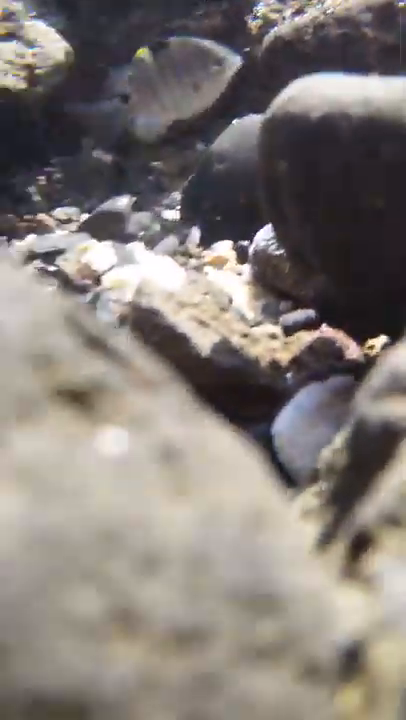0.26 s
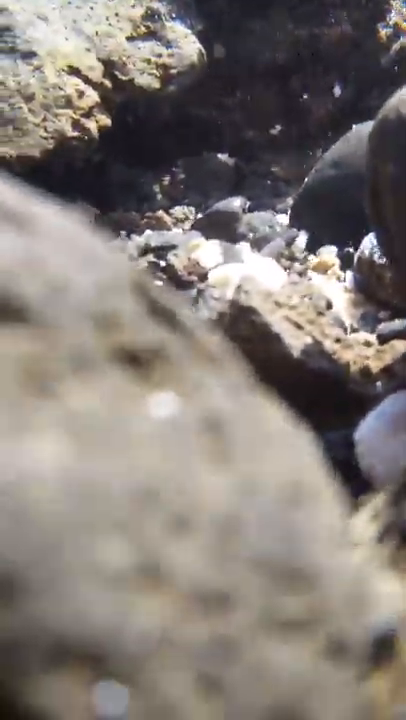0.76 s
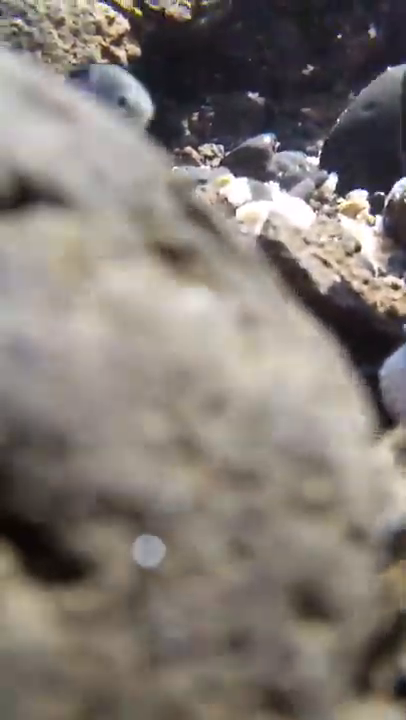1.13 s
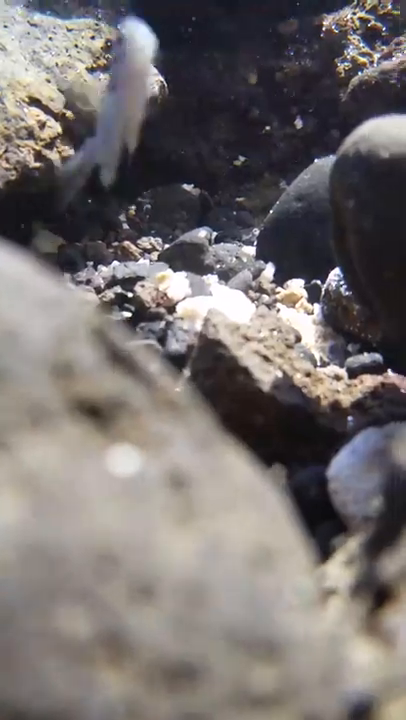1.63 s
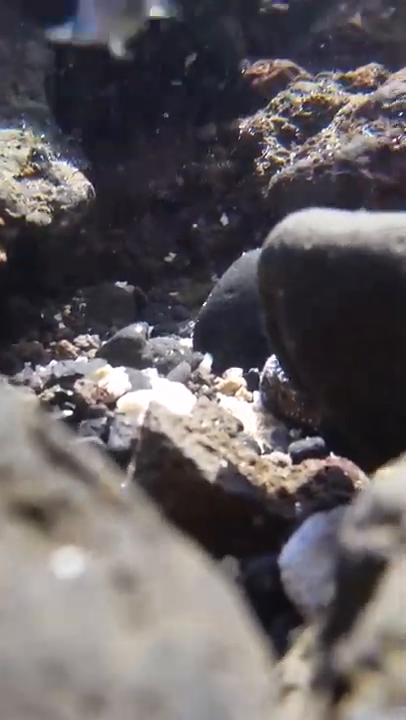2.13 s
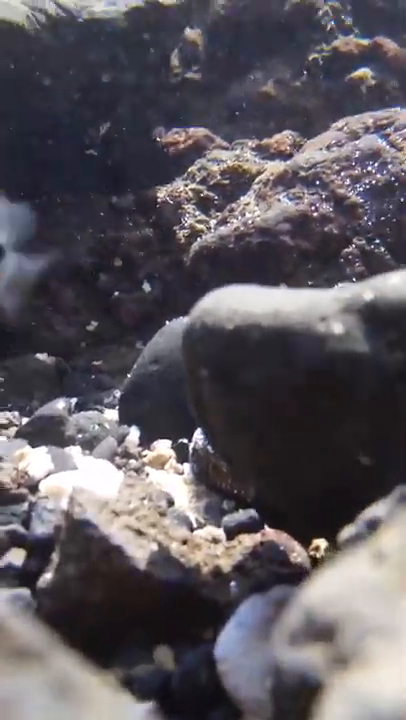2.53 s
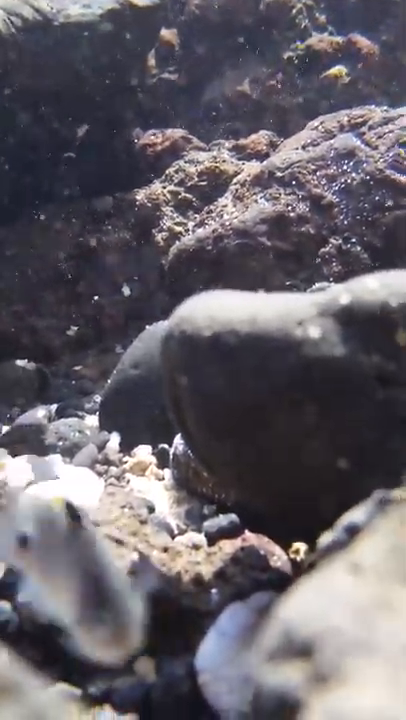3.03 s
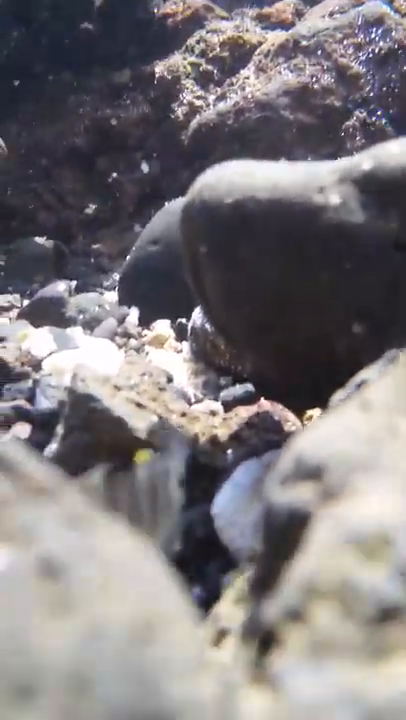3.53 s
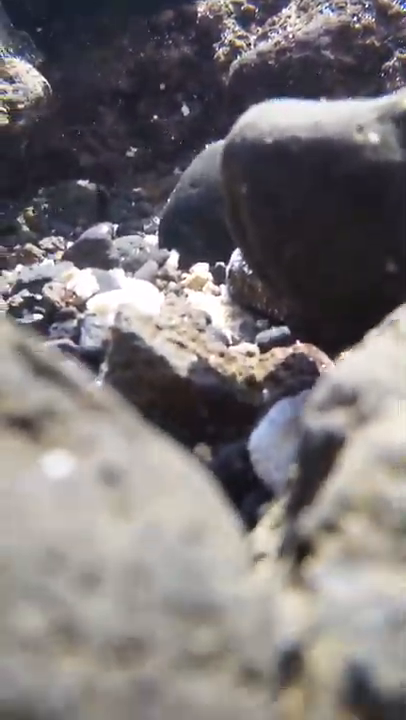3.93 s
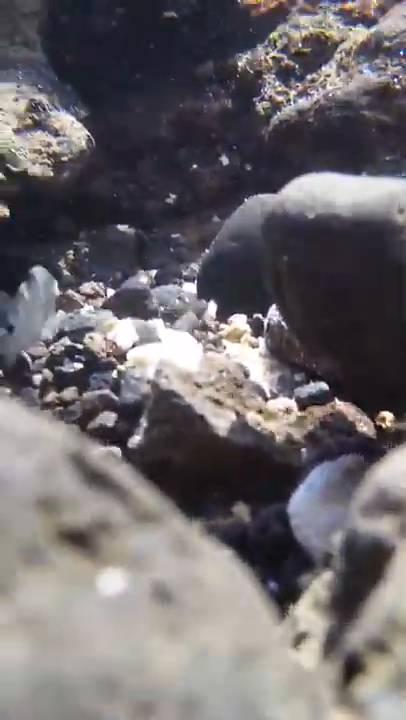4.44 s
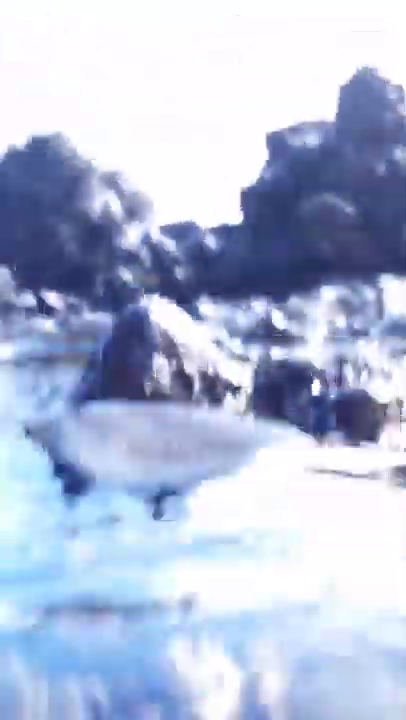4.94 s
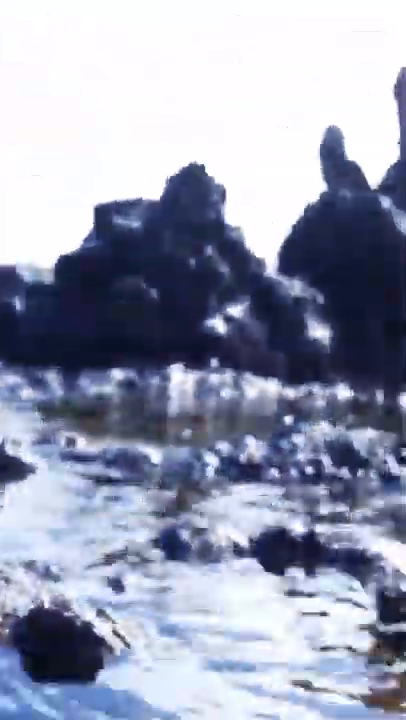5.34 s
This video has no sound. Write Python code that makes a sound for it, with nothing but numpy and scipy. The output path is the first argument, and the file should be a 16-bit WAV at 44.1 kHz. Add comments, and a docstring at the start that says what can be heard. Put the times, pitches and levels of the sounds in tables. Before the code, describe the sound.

A dull, low wash of surf heard under water runs throughout, mainly on the left, with faint bubble fizz and sand hiss. Much louder and very close on the right, stones hit the microphone's housing with short, hollow thumps. A brief scrape and a knock open the sound. Sharp knocks with a click come at 0.8 seconds, a rattle from 1.0 to 1.2, and another hard knock at 1.6. Grit then scrapes and ticks among lighter bumps, building to a dense, crunchy rattle from 2.6 to 2.9 as the wash swells slightly. Hard knocks land at 3.0, followed by ringing knocks and a scrape around 3.3. Separate knocks fall at 3.6 and between 4.1 and 4.3. At about 4.75 a loud, tight clatter and scrape come with a faint swish as the microphone surfaces. Two softer bumps follow just after 5 seconds, and the wash continues to about 5.6.

```python
"""A short scrape and a knock sound on the right, over the dull wash of surf heard under water.
A camera sits in a rocky tide pool. Stones knock on its housing in short rattles and make it ring,
and grit scrapes and ticks along it, all close to the right microphone port (its sound opening).
The left port hears mostly the surf, with a faint fizz of bubbles and a hiss of moving sand,
and near the end a swish as the camera surfaces."""
import sys
import numpy as np
from scipy import signal
from scipy.fft import rfft, irfft
from scipy.io import wavfile

SR = 44100
rng = np.random.default_rng(int(sys.argv[2]) if len(sys.argv) > 2 else 0)


def file_out(sig):
    """Save sig as 16-bit WAV at sys.argv[1]."""
    # one column per channel
    cols = np.atleast_2d(sig).T
    # limit, then scale
    lim = np.clip(cols, -1, 1)
    pcm = np.round(lim * 32767).astype(np.int16)
    wavfile.write(sys.argv[1], SR, pcm)


N = 246519
TIME = np.arange(N) / SR

# how the water surges: (time [s], left wash [dB], fizz [dB], left sand hiss [dB])
SURGE = [(0.0, -41.0, -76, -60), (0.2, -41, -89, -67.5), (0.5, -42, -86.5, -73.5),
         (0.76, -35.5, -79.5, -67), (0.95, -42.5, -85, -77.5), (1.3, -43.5, -91, -76), (1.9, -43, -91, -66),
         (2.35, -45, -89, -68.5), (2.65, -36, -81.0, -61), (2.9, -34.5, -75.0, -55.5),
         (3.03, -40, -84, -70.5), (3.3, -39.5, -103.5, -65.5), (3.6, -41.0, -94, -65.5),
         (4.05, -38.0, -89.5, -86), (4.35, -36.5, -81, -65), (4.65, -37, -73.5, -67.5),
         (5.0, -38.5, -83.5, -72.5), (5.58, -39, -83, -83)]
# tone of the wash at each port, of bubbles and of sand: (frequency [Hz], relative level [dB])
LEFT_WASH_TONE = [(25, -15.5), (60, -4), (100, 1), (150, 2), (250, -6), (400, -9.5), (600, -18.5),
                  (850, -23), (1200, -44), (1700, -53), (3000, -66), (5000, -70)]
RIGHT_WASH_TONE = [(25, -14), (60, -18), (140, 6.5), (250, -0.5), (400, -4.5), (600, -7), (850, -4),
                   (1200, -31), (1700, -47), (2300, -45), (3000, -31), (5000, -52)]
FIZZ_TONE = [(5000, -26), (9000, -22), (11000, -1.5), (12500, 7.5), (14000, -8.5), (16000, -23)]
SAND_TONE = [(600, 11), (1200, 10), (1700, 0), (2300, -6), (3200, -5.5), (4200, -16), (5500, -30),
             (9000, -33)]
# strokes of grit dragged over the housing: (start [s], swell [s], fade [s], peak force [dB])
STROKES = [(0.0, .004, .025, -51.5), (1.184, .008, 0.029, -65), (1.312, .028, 0.054, -55),
           (1.612, .032, .035, -43.5), (1.65, .02, 0.068, -54.5), (1.795, .08, 0.073, -43.5),
           (1.93, .075, 0.075, -51), (2.15, .03, 0.11, -59.5), (2.24, .125, 0.23, -54.5),
           (2.45, .125, 0.091, -46), (2.64, .04, .06, -57), (2.745, .023, .014, -32.5),
           (2.785, .008, 0.12, -45.5), (2.86, .035, 0.11, -68), (3.038, .038, 0.036, -57),
           (3.08, .11, 0.15, -66.5), (3.245, .048, .11, -45), (3.37, .022, .031, -40.5),
           (4.165, .075, .03, -57.5), (4.753, .012, .06, -38), (4.788, .018, .022, -33.5)]
# tone of grit sliding and of grit being crushed: (frequency [Hz], relative level [dB])
GRIT_TONE = [(250, 7.5), (500, 7.5), (800, 8.5), (1200, -4.5), (1900, -4.5), (2400, 1), (3000, 5),
             (3850, -3), (4300, -46), (5700, -35), (7500, -60.5), (15000, -56.5)]
CRUSH_TONE = [(1500, -21), (2800, -6.5), (3900, 6.5), (5000, -5), (6500, -13), (8500, -36), (13000, -32.5),
              (16000, -39.5)]
# low rings that scraping stirs: (frequency [Hz], relative level [dB], time to fade by 60 dB [s])
HOUSING_RINGS = [(176.6, -7.5, 0.055), (233, -9.5, 0.082), (310, -10, 0.043)]
# the loudest single grains catching: (time [s], level [dB])
TICKS = [(0.0754, -10.5), (0.8131, -7), (1.0485, -26), (1.1915, -28), (1.5891, -3), (1.61, -19.5),
         (1.8782, -14.5), (2.224, -15), (2.4935, -17), (2.5716, -8.5), (2.6531, -14), (2.671, -18),
         (2.6802, -12), (2.7324, -14), (2.7683, -14), (2.7896, 3), (2.795, -9.5), (2.8042, -11),
         (2.812, -10.5), (2.8254, -14.5), (2.8344, -15), (2.855, -15), (2.9904, -8.5), (3.3638, -12.5),
         (3.3916, -4), (3.413, -14), (4.2536, -18), (4.3345, -28.5), (4.7331, -7.5), (4.7653, -7),
         (4.8062, -9), (4.8162, -12.5)]
# thin, high snaps at a few of the loudest moments: (time [s], level [dB])
SNAPS = [(0.8132, -9), (1.5895, -22.5), (4.7339, -13), (4.753, -28), (4.806, -30), (4.816, -33)]
# tone of one grain's tick and of a snap: (frequency [Hz], relative level [dB])
TICK_TONE = [(300, -16), (700, 4.5), (1300, -3), (1950, -4.5), (2600, 3), (3200, 3), (3900, -6),
             (4700, -18), (6000, -25), (7300, -42.5), (10000, -44.5), (15000, -36.5)]
SNAP_TONE = [(5000, -13), (8500, -10.5), (11000, -4), (13000, 2), (16000, -15.5)]
# stones hitting the housing:
# (time [s], peak [dB], time for the force to rise [ms], ring pitch [Hz], ring relative to push [dB])
KNOCKS = [(0.075, -10, 2.32, 108, -24), (0.8125, 3.5, 1.81, 114, -21.5), (0.815, -10.5, 1.74, 358, -16),
          (0.8331, 2.5, 2.3, 345, -11.5), (0.8508, -3, 2.37, 330, -9), (1.0473, -1, 1.5, 102.4, 5.5),
          (1.0523, -11.5, 1.9, 134.6, -24), (1.09, -12.5, 3.5, 124, -24.5), (1.1102, -24, 3.2, 191, -19),
          (1.1597, -4.5, 2.06, 416, -8.5), (1.1827, -4, 2.02, 401, -3), (1.191, -13, 3.7, 193, 25),
          (1.379, -32, 1.6, 308, -10), (1.5884, 3.5, 2.45, 382, -10), (1.594, -17, 1.4, 395, -5.5),
          (1.6096, -3, 2.96, 323, -19.5), (1.622, -13, 3.6, 170, 15.5), (1.8272, -16.5, 0.97, 255, 5),
          (1.8748, -13, 1.08, 268, -2), (1.8902, -10.5, 1.9, 183, 2.5), (2.0638, -25.5, 4.3, 142, -7.5),
          (2.2247, -16.5, 1.2, 279.4, 3.5), (2.401, -26, 1, 197, 8), (2.516, -18, 5.3, 223, -20),
          (2.572, -17, 2.5, 189, -16), (2.5977, -13, 2.3, 422, -18.5), (2.6014, -6.5, 4.8, 176, -0.5),
          (2.6537, -5.5, 2.65, 400, -13), (2.6686, -6, 2.72, 390, -30), (2.682, -11, 2.03, 110, 9),
          (2.764, -11.5, 0.69, 179, 12), (2.7747, -4, 2.4, 305, -21), (2.789, -1.5, 1.38, 110.2, 0),
          (2.8119, -5, 3.6, 163, 2.5), (2.8375, -12, 2.1, 204, 17), (2.8745, -15.5, 1.97, 366, -19),
          (2.989, 4.5, 1.79, 394, -8.5), (3.0039, 2, 2.42, 380, -8.5), (3.0126, -5.5, 2.35, 381, -9.5),
          (3.2654, -13, 2.1, 197, 2.5), (3.282, -17.5, 1.6, 198, 6), (3.2907, -15, 1.9, 206, 9),
          (3.313, -0.9, 1.59, 216, 7), (3.3629, -3, 2.2, 223, 6), (3.3767, -10.5, 1.7, 172, 8.5),
          (3.3886, -12.5, 0.94, 320, 4.5), (3.6014, -3.5, 1.36, 183.6, -17.5), (3.628, -15, 2.9, 292, -7.5),
          (4.1161, -2, 2.03, 328.5, -7), (4.147, -2.5, 1.62, 357, -3), (4.2535, -9, 1.26, 380, -2),
          (4.3337, -2, 2.38, 332, -14), (4.7321, 4.5, 1.7, 263, -20.5), (4.7339, -3.5, 2.77, 148, -13),
          (4.7526, -2, 0.84, 108, 5.5), (4.7598, 3.5, 1.9, 179, -25.5), (4.765, 0.5, 1.55, 187, -29.5),
          (4.7705, -2.5, 1.52, 179.6, -9), (4.7802, -17, 2.9, 185, -2), (4.7995, -9.5, 1.12, 426, -4),
          (5.0427, -17, 4.9, 110, 2), (5.0669, -8, 2.88, 137, -13.5)]
# how the housing wall passes a knock on to the port: (frequency [Hz], relative level [dB])
WALL_TONE = [(100, 3.5), (480, 4), (780, 5.5), (1300, 4), (1800, -11), (2300, 11), (3000, 16.5), (3800, 15),
             (5500, 5.5)]


def from_db(db):
    """Turn decibels into a number to multiply by."""
    return 10 ** (np.asarray(db) / 20)


def rms_one(x):
    """Scale a sound so its average strength (rms) is 1."""
    return x / np.sqrt(np.mean(x ** 2) + 1e-20)


def peak_one(x):
    """Scale a sound so its peak is 1."""
    return x / (np.abs(x).max() + 1e-20)


def in_time(rows):
    """Join a table's points with straight lines, one curve per column after the time."""
    times, *columns = np.transpose(rows)
    return [np.interp(TIME, times, column) for column in columns]


def keep_side(x, hz, side, order=2):
    """Keep the "low" or "high" side of a frequency."""
    return signal.sosfilt(signal.butter(order, hz, side, fs=SR, output="sos"), x)


def colour(x, tone, size=8192):
    """Give a sound the tone in a table; white noise keeps its overall level."""
    hz, db = np.transpose(tone)
    grid_hz = np.maximum(np.fft.rfftfreq(size, 1 / SR), 1)
    gains = from_db(np.interp(np.log(grid_hz), np.log(hz), db))
    # fold the filter so that nothing sounds before its cause (minimum phase)
    cepstrum = irfft(np.log(gains))
    cepstrum[1:size // 2] *= 2
    cepstrum[size // 2 + 1:] = 0
    response = irfft(np.exp(rfft(cepstrum)))
    return signal.fftconvolve(x, response / np.linalg.norm(response))[:len(x)]


def drift(steps_per_s):
    """A curve that wanders between random values, mostly within -1 to 1."""
    steps = rng.standard_normal(8192)
    return np.interp(TIME * steps_per_s, np.arange(len(steps)), steps)


def ring(push, hz, fade_s):
    """A push starts one note ringing; it falls by 60 dB in fade_s."""
    decay = from_db(-60 / (fade_s * SR))
    angle = 2 * np.pi * hz / SR
    return signal.lfilter([1, -1], [1, -2 * decay * np.cos(angle), decay * decay], push)


def add(track, start_s, sound):
    """Mix a sound into a track at a given time."""
    start = round(start_s * SR)
    track[start:start + len(sound)] += sound[:N - start]


def surf(right_db=-12.0, waver_db=0.8):
    """Churning water, muffled differently at each port, and a fizz of fine bubbles on the left."""
    wash_db, fizz_db, _ = in_time(SURGE)
    noise = rng.standard_normal((3, N))
    swell = from_db(wash_db + waver_db * drift(25))
    left = swell * keep_side(colour(noise[0], LEFT_WASH_TONE), 5500, "low")
    right = from_db(right_db) * swell * colour(noise[1], RIGHT_WASH_TONE)
    fizz = from_db(fizz_db) * colour(noise[2], FIZZ_TONE)
    return np.array([left + fizz, right])


def currents(contacts, rumble_db=-55, slosh_db=-15, settle_s=0.034, graze_db=-9):
    """Sand hisses on the left and grazes the right, where water rumbles, more so after a contact."""
    *_, sand_db = in_time(SURGE)
    noise = rng.standard_normal((3, N))
    sand = from_db(sand_db) * colour(noise[0], SAND_TONE)
    graze = from_db(sand_db + graze_db) * colour(noise[1], GRIT_TONE)
    decay = np.exp(-1 / (settle_s * SR))
    slosh = signal.lfilter([1 - decay], [1, -decay], np.abs(contacts))   # smoothed contact strength
    low_noise = keep_side(noise[2], 90, "low", order=4)
    rumble = rms_one(keep_side(low_noise, 42, "high"))
    rumble *= from_db(rumble_db) + from_db(slosh_db) * slosh
    return np.array([sand, graze + rumble])


def surfacing(start_s=4.73, length_s=0.11, level_db=-54):
    """A brief swish as the camera breaks the surface."""
    swell = np.sin(np.pi * np.clip((TIME - start_s) / length_s, 0, 1))
    return from_db(level_db) * swell * colour(rng.standard_normal(N), SAND_TONE)


def stroke_force(sharpness=1.2):
    """Each stroke of grit presses harder up to a peak, then lets go."""
    power = np.zeros(N)
    for start_s, swell_s, fade_s, peak_db in STROKES:
        ramp = np.interp(TIME - start_s, [0, swell_s, swell_s + fade_s], [0, 1, 0])
        power += (from_db(peak_db) * np.sin(np.pi / 2 * ramp) ** sharpness) ** 2
    return np.sqrt(power + 1e-12)


def scrape(force, slips_per_s=6000, size_db=3.0, judder_db=4.0, rasp_db=4, crush_db=13, hum_db=13):
    """Many tiny slips rasp and set the housing humming; hard pressure crushes grit, which is brighter."""
    sizes = from_db(size_db * np.minimum(rng.exponential(1, N), 5))
    directions = rng.choice([-1, 1], N)
    slipping = rng.random(N) < slips_per_s / SR
    slips = rms_one(sizes * directions * slipping * from_db(judder_db * drift(300)))
    rasp = from_db(rasp_db) * colour(slips * force, GRIT_TONE)
    crushing = slips * rng.standard_normal(N) * force ** 1.687   # grows faster than the force
    crush = from_db(crush_db) * colour(crushing, CRUSH_TONE)
    drag = keep_side(slips, 750, "low") * force ** 0.69   # even a light rub stirs the housing
    hum = sum(from_db(db) * rms_one(ring(drag, hz, fade_s)) for hz, db, fade_s in HOUSING_RINGS)
    return rasp + crush + from_db(hum_db) * np.std(force) * rms_one(hum)


def ticks(force, decay_s=0.00087, chances_per_s=42, above_force_db=21, spread_db=3.0, chances=250):
    """A grain catches and lets go with a tiny crunch. More grains catch at random during a stroke."""
    out, t = np.zeros(N), TIME[:SR // 100]
    times = np.cumsum(rng.exponential(1 / chances_per_s, chances))
    levels_db = 20 * np.log10(np.interp(times, TIME, force)) + above_force_db
    levels_db += spread_db * rng.standard_normal(chances).clip(-1, 1)
    catches = [(s, db) for s, db in zip(times, levels_db) if s < TIME[-1] and db > -50]
    noises = rng.standard_normal((len(TICKS) + chances, len(t)))
    for (start_s, level_db), noise in zip(TICKS + catches, noises):
        top_hz = max(7600 * from_db(0.37 * level_db), 4200)   # harder catches are brighter
        crack = colour(noise * np.exp(-t / decay_s), TICK_TONE)
        crunch = keep_side(crack, top_hz, "low", order=4)
        add(out, start_s, from_db(level_db) * crunch / np.linalg.norm(crunch))
    return out


def snaps():
    """A thin, high snap crackles at a few of the loudest moments."""
    clicks = np.zeros(N)
    for start_s, level_db in SNAPS:
        add(clicks, start_s, from_db([level_db]))
    return colour(clicks, SNAP_TONE)


def knocks(sharpness=4.82, low_cut_hz=68, clack_hz=3000, clack_fade_s=0.0062, hard_clack_db=-36):
    """A stone gives one smooth push; the housing answers with a thump, a low ring and a faint clack."""
    out, t = np.zeros(N), TIME[:SR // 10]
    clack_shape = from_db(-60 * t / clack_fade_s) * (1 - np.exp(-t * clack_hz))
    clack = np.sin(2 * np.pi * clack_hz * t) * clack_shape
    for start_s, peak_db, rise_ms, ring_hz, ring_db in KNOCKS:
        rise_s = rise_ms / 1000
        force = (t / rise_s * np.exp(1 - t / rise_s)) ** sharpness
        push = peak_one(-np.gradient(force))   # sound pressure follows the change of force
        fade_s = 0.033 * from_db(-0.33 * peak_db)   # harder blows press on the housing and damp it
        ringing = from_db(ring_db) * peak_one(ring(push, ring_hz, fade_s))
        thump = keep_side(colour(push + ringing, WALL_TONE), low_cut_hz, "high")
        add(out, start_s, from_db(peak_db) * peak_one(thump))
        # light or soft contacts barely make the stiff wall clack
        hardness = min(from_db(peak_db), 1) ** .5 * min(2 / rise_ms, 1) ** 2
        add(out, start_s + rise_s / 2, from_db(peak_db + hard_clack_db) * hardness * clack)
    return out


def scene(leak_db=-48):
    """Water sounds at both ports; stones and grit reach the right one and barely leak to the left."""
    force = stroke_force()
    contacts = knocks() + snaps() + scrape(force) + ticks(force)
    water = surf() + currents(contacts)
    left = surfacing() + from_db(leak_db) * contacts
    return water + np.array([left, contacts])


def record(dry, top_hz=15900):
    """Round off the loudest peaks, then remove the highest treble."""
    rounded = dry / (1 + dry ** 6) ** (1 / 6)
    return signal.sosfilt(signal.ellip(10, .1, 80, top_hz, fs=SR, output="sos"), rounded)


dry = scene()
out = record(dry)
file_out(out)
```